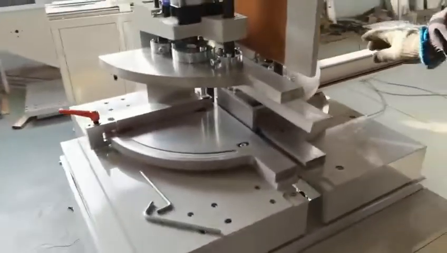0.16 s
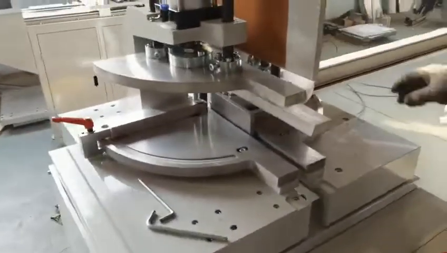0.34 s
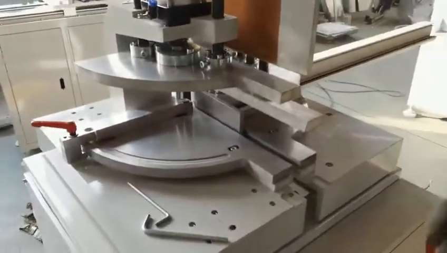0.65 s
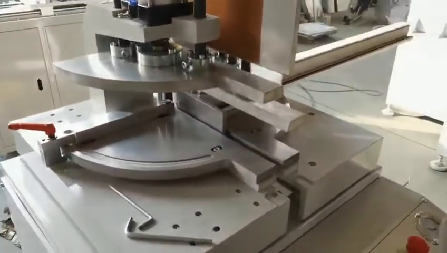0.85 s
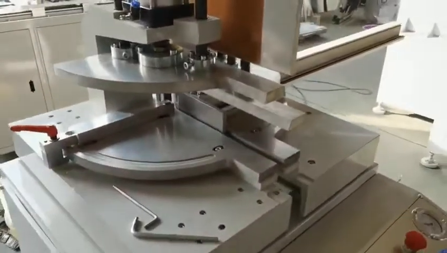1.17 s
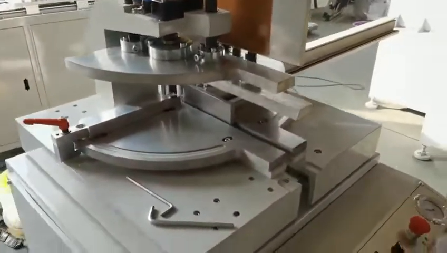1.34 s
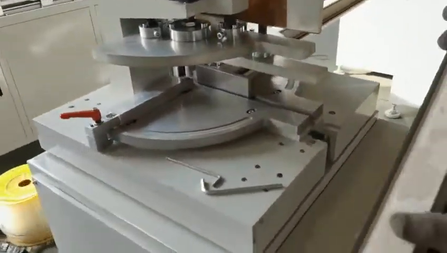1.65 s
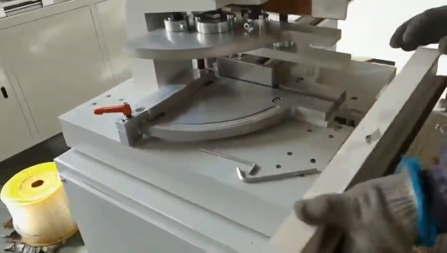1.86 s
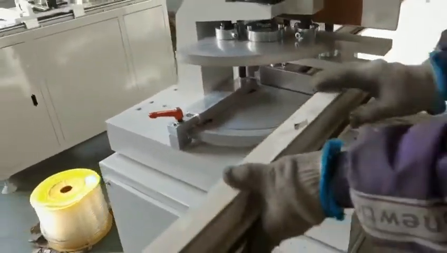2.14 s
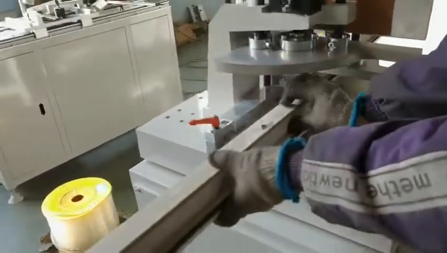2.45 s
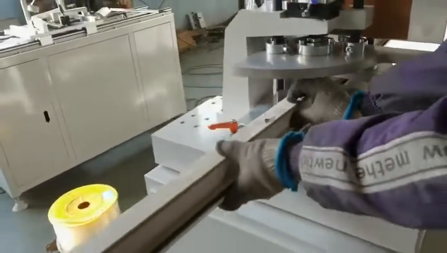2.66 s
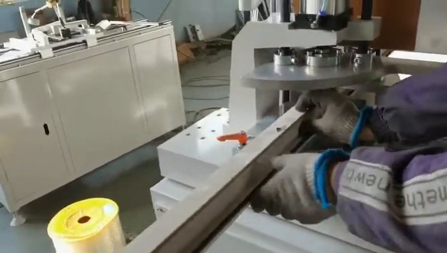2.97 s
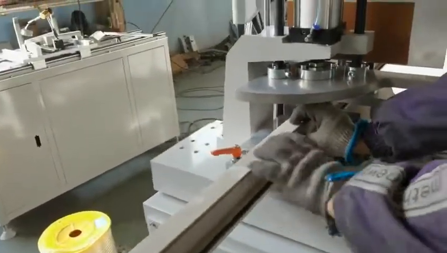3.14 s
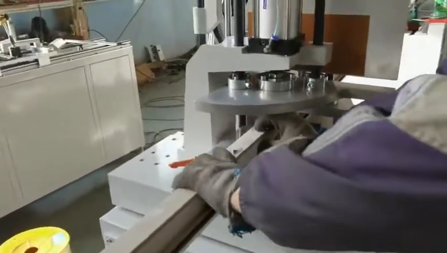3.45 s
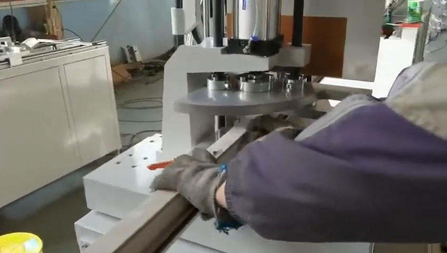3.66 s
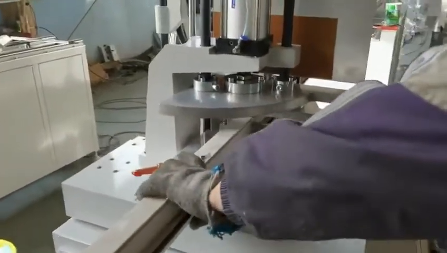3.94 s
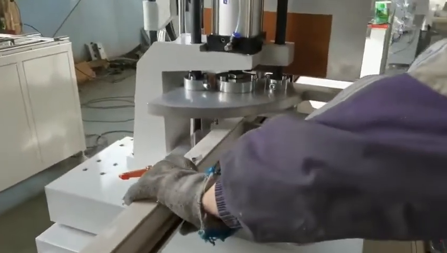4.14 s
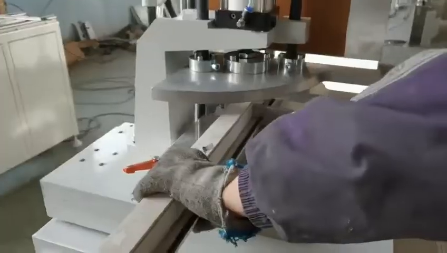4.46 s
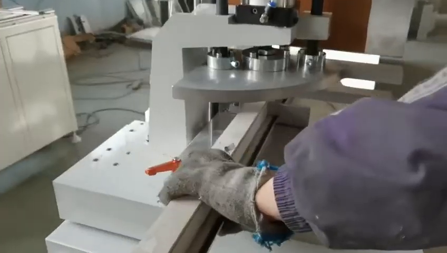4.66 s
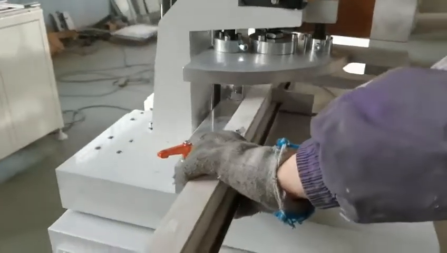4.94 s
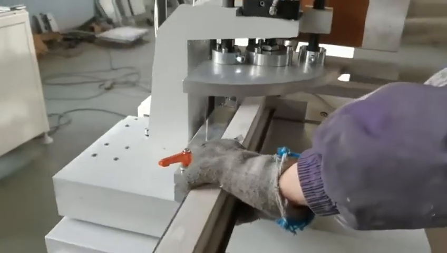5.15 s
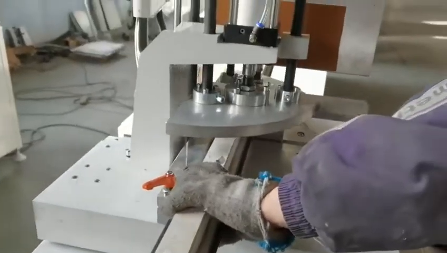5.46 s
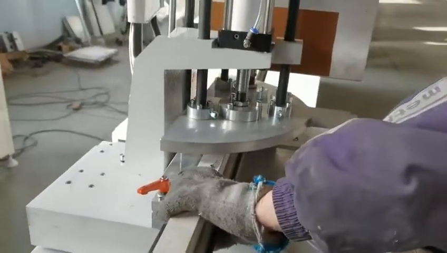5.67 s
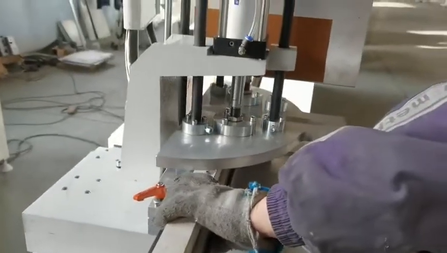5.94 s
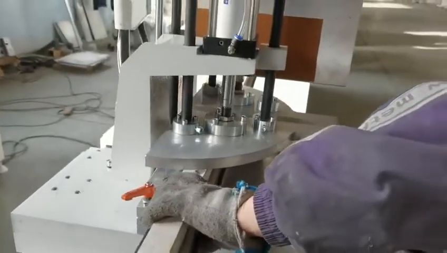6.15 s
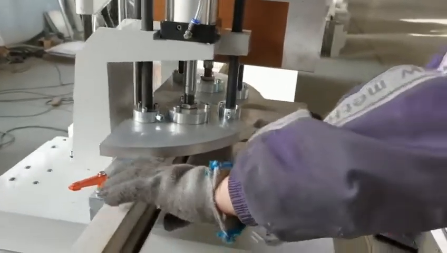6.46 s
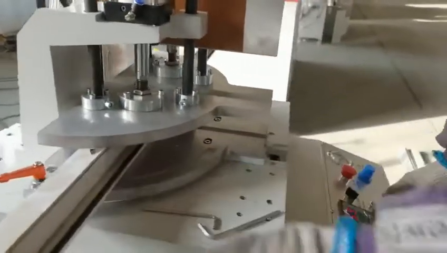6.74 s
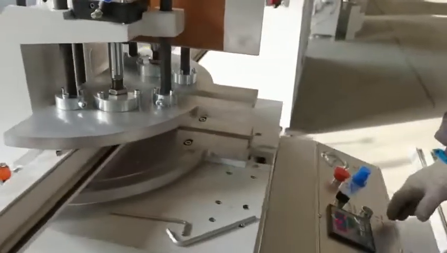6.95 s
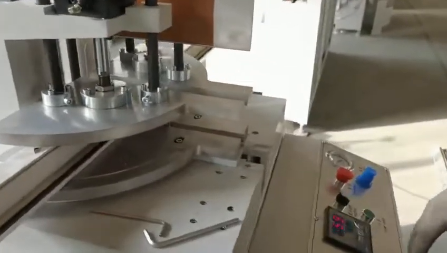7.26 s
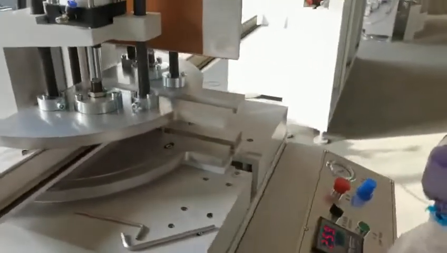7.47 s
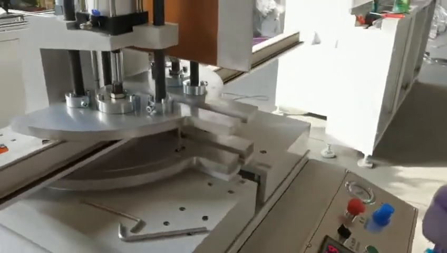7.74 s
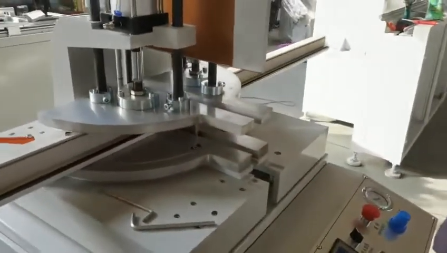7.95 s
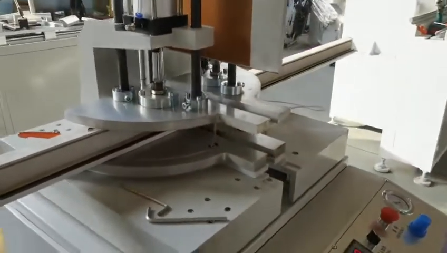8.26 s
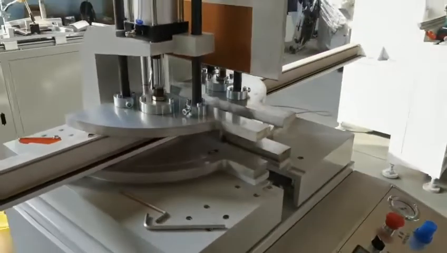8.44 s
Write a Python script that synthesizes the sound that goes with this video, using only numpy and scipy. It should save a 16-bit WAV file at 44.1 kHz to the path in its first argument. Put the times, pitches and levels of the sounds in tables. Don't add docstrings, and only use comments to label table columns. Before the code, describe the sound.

Close in a workshop with a low hum, small air spits and light metal taps come first. A hollow profile lands and knocks against stops, then two valves burst into bright fading hisses. A longer, louder press hiss follows, ending in a dull boom. After quiet leaking air, a short blast leads to hard metallic clamp slams. A small stereo microphone gives a crisp, treble-heavy sound.

```python
import sys
import numpy as np
from scipy import signal
from scipy.fft import rfft, irfft
from scipy.io import wavfile
from scipy.ndimage import uniform_filter1d

SR = 44100
rng = np.random.default_rng(int(sys.argv[2]) if len(sys.argv) > 2 else 0)


def level_to_linear(level):
    exponent = np.asarray(level, float) / 20
    return 10 ** exponent


def dump(signal):
    limited = np.clip(np.atleast_2d(signal).T, -1, 1)
    pcm = np.round(limited * 32767).astype(np.int16)
    wavfile.write(sys.argv[1], SR, pcm)


N = 379260
HZ = np.maximum(np.fft.rfftfreq(N, 1 / SR), 1)
CUTOFF_HZ = 16000
FRONT_LAG_S = -.00003

# (frequency [Hz], left-right [dB])
SIDES = [(60, 1), (110, 0), (200, 1), (380, 1.5), (700, 2), (1290, 0), (2380, 1.5), (4400, -3.5), (8120, 2),
         (12000, 7), (15000, -8)]
# (frequency [Hz], left-right likeness [0-1])
LIKENESS = [(60, 0.99), (250, 0.94), (600, 0.6), (1200, 0.021), (4000, 0.4), (12000, 0.37)]
# (frequency [Hz], level [dB per Hz])
HALL_COLOUR = [(15, -38), (25, -51.5), (54, 8), (81, -0.5), (207, -2.5), (373, -6.5), (1000, -30),
               (2020, -7.5), (4040, -16), (5280, -21.5), (7090, -19), (8550, -6.5), (10600, -36),
               (12400, -63), (15000, -44)]

# (frequency [Hz], level [dB per Hz])
RUB_COLOUR = [(240, -25), (400, -2.5), (547, 7), (673, 3), (846, 3), (1070, 4), (1290, 7.5), (2200, 1),
              (2860, -5), (4840, -120)]
# (frequency [Hz], level [dB per Hz])
TABLE_COLOUR = [(41, -42), (70, -14), (145, 7), (184, 1), (230, 4), (320, -3.5), (351, -4.5), (486, -7.5),
                (520, -8), (680, -52), (1140, -120)]
REST_DB = -62.5, -58.5, -57.5
# (peak [s], rise [s], hold [s], level [dB], fall [dB/s])
SLIDES = [(0.01, .02, 0.57, -57, 23), (1.167, 0.027, 0.053, -37, 75), (1.444, .1, .05, -52.5, 12),
          (2.325, 0.029, .01, -43, 150), (2.635, 0.24, .02, -41.5, 138), (2.856, .012, 0.039, -43.5, 76),
          (3.328, .025, 0.1, -49.5, 13), (3.863, .02, 0.11, -45.5, 50), (4.85, 0.46, .1, -53.5, 8),
          (5.758, .025, 0.009, -53, 261), (6.737, 0.19, 0.38, -55, 4.5), (8.086, 0.011, 0.013, -29, 73),
          (8.404, 0.053, 0.0077, -39, 91)]
# (peak [s], rise [s], hold [s], level [dB], fall [dB/s])
THUDS = [(.72, 0.76, .01, -46.5, 170), (.9, 0.083, .2, -48, 32), (1.14, .03, .07, -41.5, 45),
         (2.325, 0.013, 0.007, -41, 210), (2.64, .4, .01, -42.5, 46), (2.856, 0.0046, 0.016, -29, 61),
         (3.33, 0.028, 0.051, -38.5, 47), (3.832, 0.0074, 0.012, -25, 78), (4.0, .1, .05, -38, 44),
         (4.52, 0.23, .1, -49, 19), (4.9, 0.1, .03, -48.5, 100), (5.8, 0.044, 0.022, -43, 69),
         (6.37, 0.68, 0.009, -52.5, 47), (6.75, 0.026, .01, -42, 47), (7.46, .6, 0.23, -54, 97),
         (7.879, 0.079, .03, -53, 99), (8.11, 0.063, .01, -39, 81), (8.31, 0.013, 0.046, -33, 37),
         (8.4, 0.059, 0.016, -25.5, 61)]
# (peak [s], rise [s], hold [s], level [dB], fall [dB/s])
STEPS = [
    (.02, .02, 0.76, -48, 25),
    (2.85, .5, 0.49, -49, 30),
    (3.33, 0.033, .01, -37, 137),
    (3.5, 0.089, .3, -51, 40),
    (4.52, 0.12, 0.011, -46, 30),
    (5.78, 0.36, .03, -48.5, 27.5),
    (6.74, 0.23, 0.3, -45.5, 21.9),
    (7.9, 0.14, 0.08, -54, 174),
    (8.31, 0.022, 0.35, -49, 30),
]

# (frequency [Hz], level [dB per Hz])
HISS_COLOUR = [(710, -52), (1200, -14), (1590, -23.5), (2060, -14), (4350, -14), (4850, -6.5), (7350, -5.5),
               (8180, 0), (8640, 3.5), (11200, -21.5), (11800, -28.5), (15800, -31)]
# (frequency [Hz], width [Hz], level [dB])
WHISTLES = [(5230, 300, 9.5), (5570, 56, 8), (6165, 1240, 17), (8350, 340, -3), (8700, 14, -47)]
# (frequency [Hz], width [Hz], level [dB])
LEFT_VALVE_NOTES = [(4770, 64, 11), (5600, 75, 15), (6000, 75, 9), (6530, 66, 6), (7100, 56, 17),
                    (8100, 78, -7), (8560, 72, -6), (9070, 79, 11), (9300, 50, 9), (9950, 95, 11.5)]
# (left delay [s], right delay [s], level [dB])
REFLECTIONS = [(.0046, .0039, -11), (.0071, .0083, -9.5), (0.0136, .0119, -17.5), (.021, 0.028, -11.5)]
# (low edge [Hz], high edge [Hz])
AIR_EDGES_HZ = [7600, 10800], [4400, 7600], [1500, 4400], [10800, 16000]
# (peak [s], rise [s], hold [s], level [dB], fall [dB/s])
BLASTS = [
    (2.859, 0.0089, 0.059, -18.5, 105),
    (3.834, .002, .008, -23, 150),
    (3.85, 0.016, 0.046, -18.5, 22),
    (4.893, 0.0069, 0.024, -14.5, 152),
    (7.972, 0.0064, 0.012, -17.5, 300),
]
# (peak [s], rise [s], hold [s], level [dB], fall [dB/s])
EXHAUSTS = [
    (2.92, 0.066, .02, -26, 6),
    (3.9, 0.066, 0.064, -24, 9.4),
]
# (peak [s], rise [s], hold [s], level [dB], fall [dB/s])
PRESSING = [
    (4.97, 0.049, 0.83, -23.5, 44.3),
    (5.05, 0.088, 0.049, -26, 30),
    (7.985, 0.029, 0.083, -28, 54),
]
# (peak [s], rise [s], hold [s], level [dB], fall [dB/s])
LEAKS = [
    (6.1, 0.35, 0.44, -40, 14),
    (6.85, 0.5, 0.0091, -36, 88),
    (6.893, .002, 0.039, -29, 210),
    (7.0, .1, 0.95, -44, 49),
    (7.7, 0.1, 0.018, -37.5, 100),
]
# (peak [s], rise [s], hold [s], level [dB], fall [dB/s])
PUFFS = [(.215, 0.035, 0.015, -50, 41.7), (.4, .01, .02, -54.5, 100), (.49, 0.048, 0.038, -30.5, 169),
         (.76, 0.096, 0.026, -40, 30), (.9, 0.073, 0.17, -45, 200), (1.2, 0.097, 0.0055, -29, 118),
         (1.44, .1, 0.092, -50, 60), (1.57, 0.086, .01, -41.5, 100), (1.63, 0.049, 0.072, -27.5, 300),
         (1.74, 0.068, 0.017, -32, 394), (1.93, 0.3, 0.091, -54, 50), (2.115, 0.031, 0.014, -36, 250)]
# (peak [s], rise [s], hold [s], level [dB], fall [dB/s])
SCUFFS = [
    (2.346, 0.015, 0.021, -42, 89.5),
    (2.43, 0.045, 0.026, -51.5, 41),
    (2.6, 0.066, .015, -46.5, 200),
    (2.64, 0.012, 0.021, -45.5, 350),
    (6.893, .002, 0.037, -34.5, 250),
    (8.1, 0.045, 0.024, -32.5, 64.7),
    (8.25, .1, 0.13, -42, 79),
    (8.4, 0.037, 0.0074, -40, 92.5),
]
# (jet, low roar, top hiss re core [dB], left-right [dB], left valve share [0-1])
BLAST_COLOUR = (-15, -19, -17.5, -2.5, 0.57)
EXHAUST_COLOUR = (-6.5, -9.5, -12.5, -1.5, 0.34)
PRESS_COLOUR = (-4.5, -13.5, -8.5, -1.5, 0.5)
LEAK_COLOUR = (-5, -10, -16, -2.5, 0.23)
PUFF_COLOUR = (-7.5, -17, -21, -5, 0.5)
SCUFF_COLOUR = (3, -6, -43, -4.5, 0)

# (start [s], end [s], pitch [Hz], width [Hz], level
# [dB])
SQUEAKS = [(0.47, 0.82, 2450, 300, -53), (0.53, 1.01, 1830, 150, -49), (0.52, 0.8, 1600, 130, -54),
           (.48, .56, 2500, 700, -50), (2.87, 3.7, 5150, 60, -43), (4.9, 5.9, 4750, 200, -40),
           (.9, 1.004, 2640, 100, -55), (1.121, 1.36, 855, 120, -38.5), (1.157, 1.336, 257, 27, -32.5),
           (1.653, 1.71, 2480, 600, -46.5), (1.719, 1.782, 2580, 500, -38.5), (0.515, 1.4, 523, 92, -55.5),
           (2.617, 2.767, 1920, 170, -42.5), (2.717, 3.396, 1210, 200, -48), (2.854, 2.903, 5100, 220, -39),
           (4.146, 4.734, 1240, 116, -45.5), (4.25, 4.592, 1065, 58, -63.5),
           (6.548, 6.766, 1210, 110, -52.5), (6.736, 6.86, 560, 73, -45.5),
           (7.97, 8.08, 4950, 100, -38), (7.972, 8.0, 3240, 160, -40), (7.975, 8.0, 6200, 1500, -26),
               (2.44, 2.485, 2200, 500, -49), (2.44, 2.485, 1300, 700, -44.5),
               (1.115, 1.39, 3500, 830, -46.5), (1.13, 1.33, 1290, 82, -44.5),
               (1.13, 1.34, 1680, 54, -46.5), (2.556, 2.62, 1200, 810, -45), (2.632, 2.68, 2100, 630, -46),
               (3.325, 3.4, 410, 120, -35.5), (3.37, 3.395, 520, 150, -39), (8.1, 8.22, 4880, 150, -41),
               (8.1, 8.4, 4350, 92, -40.5), (8.12, 8.46, 5600, 510, -45), (8.2, 8.45, 4870, 74, -40),
               (8.58, 8.599, 540, 100, -40), (8.1, 8.45, 2300, 110, -61), (7.68, 7.78, 2070, 730, -41.5),
               (2.33, 2.38, 1010, 210, -39), (6.9, 6.96, 1100, 700, -46), (0.6, 0.67, 76, 12, -50),
               (1.48, 1.6, 8300, 1200, -44.5), (1.14, 1.3, 780, 30, -46), (1.14, 1.27, 544, 15, -50.5),
               (.35, .5, 2650, 53, -59), (.95, 1.13, 69, 10, -41.5), (7.955, 7.99, 146, 39, -35.5),
               (8.39, 8.463, 490, 250, -30.5)]
# (start [s], end [s], pitch [Hz], width [Hz], level [dB])
CYLINDER_NOTE = (8.16, 8.54, 5180, 110, -32.5)

# (pitch [Hz], level [dB], t60 [s])
PROFILE_MODES = [(546.5, -1.5, 0.13), (810, -2, 0.037), (1270, -5, 0.066), (1450, -6, 0.11),
                 (1940, -5, 0.056), (2490, 0, 0.034), (2810, -17, 0.028)]
# (pitch [Hz], level [dB], t60 [s])
BED_MODES = [(114, -17, 0.15), (149, 1.5, 0.075), (236, -23, 0.32), (320, -21, 0.047), (482, -5, 0.066)]
# (time [s], peak [dB], treble re peak [dB], bass re peak [dB], contact pitch [Hz])
TICKS = [
    (1.919, -37, 9, -31, 2200),
    (0.399, -31, 1, -14, 2060),
    (2.308, -15, -5, -25, 2030),
    (2.626, -8, 4.5, -35, 1600),
    (2.621, -28, -5, -20, 900),
    (2.359, -26, 2, -20, 1100),
    (8.041, -24, 5, -20, 2900),
    (8.388, -22, -5, -8, 500),
    (6.745, -32, 19, 7, 522),
]
# (time [s], peak [dB], treble re peak [dB], bass re peak [dB], contact pitch [Hz])
TAPS = [
    (1.112, -16.5, 21.5, -25, 905),
    (1.144, -25, -7, -16, 826),
    (2.332, -29, 12, -16, 1170),
    (2.345, -25, 8, -9, 1130),
    (2.856, -23, 3, -19, 2960),
    (4.889, -39, 19, 0, 1920),
    (6.89, -45, 3, -11, 2110),
    (7.953, -34, 23, 9, 528),
    (7.970, -24, 22, -2, 3240),
]
# (time [s], peak [dB], treble re peak [dB], bass re peak [dB], contact pitch [Hz])
CLUNKS = [
    (2.493, -21.5, -2, -25, 870),
    (2.557, -26.5, -14, -12, 568),
    (3.313, -14, -11, -31, 1010),
    (5.759, -23, 8, -7, 1490),
]
# (time [s], peak [dB], treble re peak [dB], bass re peak [dB], contact pitch [Hz])
SLAMS = [
    (8.080, -13, 10, -30, 780),
    (8.093, -9, -17, -32, 1470),
    (8.394, -15, -6, -11, 610),
]
KNOCK_T60_S = .042, .063, .09, .16
# (time [s], pitch [Hz], peak [dB], t60 [s])
STRUCK = [(1.112, 824, -29, 0.046), (1.112, 1300, -29, .05), (1.112, 1630, -28, .05),
          (1.112, 2230, -31, .04), (1.112, 6000, -22, .02), (2.308, 2610, -2, .003),
          (2.308, 5200, -5, .0025), (2.308, 1500, -14, .008), (2.315, 2000, -22, .01),
          (2.332, 1300, -13, .006), (.398, 2050, -36, .05), (2.494, 1100, -19, .012),
          (2.6263, 1400, -15, .012), (1.92, 2200, -34, .01), (3.833, 8500, -16, .02),
          (4.889, 8500, -12, .02), (2.626, 1895, -25, .04), (3.313, 954, -25, .08),
          (3.313, 1400, -30, 0.053), (3.313, 1940, -24, .045), (3.313, 2550, -23.5, 0.045),
          (3.313, 3050, -23, .045), (5.76, 600, -33, .05), (5.761, 1900, -33, .04),
          (5.767, 830, -32, 0.071), (8.079, 4754, -12.5, 0.11), (8.079, 4050, -18, .08),
          (8.081, 986, -19.5, .06), (8.093, 1513, -17, 0.067), (8.093, 2950, -21, .05),
          (8.093, 650, -26.5, 0.091), (8.396, 584, -22, 0.11), (8.392, 860, -29, .06)]
# (start [s], pitch [Hz], width [Hz], level [dB], t60 [s])
DYING = [(3.312, 505, 220, -31, 0.44), (3.335, 265, 73, -32.5, 0.51), (3.311, 930, 180, -32, 0.098),
         (5.762, 810, 230, -43, .15), (5.765, 440, 240, -39, .4), (1.113, 900, 140, -36, .12),
         (2.346, 1000, 600, -42, .05), (2.495, 700, 280, -35, 0.056), (8.079, 4670, 500, -20.5, .15),
         (2.855, 5150, 200, -31.5, .25), (7.972, 5000, 180, -35, 0.3)]


def rms_one(x):
    return x / np.sqrt(np.mean(np.atleast_2d(x).mean(axis=0) ** 2) + 1e-20)


def at_hz(points):
    hz, db = np.transpose(points)
    return np.interp(np.log(HZ), np.log(hz), db)


def pan(left_right_db):
    return level_to_linear(left_right_db * np.array([[.5], [-.5]]))


def white():
    return rng.standard_normal(N)


def band(low_hz, high_hz, order=8):
    low_cut = 1 + (low_hz / HZ) ** (2 * order)
    high_cut = 1 + (HZ / high_hz) ** (2 * order)
    return 1 / np.sqrt(low_cut * high_cut)


def peaks(rows):
    return sum(level_to_linear(db) / (1 + (2 * (HZ - hz) / width_hz) ** 2) for hz, width_hz, db in rows)


def resonator(zeros, hz, width_hz):
    r = np.exp(-np.pi * width_hz / SR)
    return [*zeros, 1, -2 * r * np.cos(2 * np.pi * hz / SR), r * r]


def drift(rate_hz):
    r = np.exp(-80 * np.pi * rate_hz / SR)
    slow = signal.lfilter([1], [1, -2 * r, r * r], rng.standard_normal(N // 40 + 2002))[2000:]
    return np.interp(np.arange(N) / 40, np.arange(len(slow)), rms_one(slow))


def per_sample(control):
    return np.interp(np.arange(N) / 32, np.arange(len(control)), control)


def swells(rows, rest_db=-120):
    t = np.arange(0, N + 32, 32) / SR
    power = level_to_linear(2 * rest_db)
    for peak_s, rise_s, hold_s, db, fall_db_per_s in rows:
        below_db = 16 * np.clip(peak_s - t, 0, None) / rise_s
        below_db = below_db * (1 + 20 * (t < peak_s - rise_s))
        fallen_db = fall_db_per_s * np.clip(t - peak_s - hold_s, 0, None)
        power = power + level_to_linear(2 * (db - below_db - fallen_db))
    return power


def two_ports(source, lag_s=0):
    alike = at_hz(LIKENESS)
    left, other = rfft(source()), rfft(source())
    shared = alike * left * np.exp(-2j * np.pi * HZ * lag_s)
    right = shared + np.sqrt(1 - alike ** 2) * other
    return np.array([left, right]) * pan(at_hz(SIDES))


def hall():
    spectrum = two_ports(white, lag_s=-0.00013) * level_to_linear(at_hz(HALL_COLOUR)) * band(28, CUTOFF_HZ, order=2)
    return level_to_linear(-52.5) * pan(-2) * rms_one(irfft(spectrum, N))


def grit():
    grains = rng.random(N) < 1500 / SR
    return white() * (0.2 + grains)


def rubbing():
    tables = (SLIDES, THUDS, STEPS)
    rub_db, rumble_db, deep_db = (per_sample(10 * np.log10(swells(rows, rest_db)))
                                  for rows, rest_db in zip(tables, REST_DB))
    rub = irfft(two_ports(grit) * level_to_linear(at_hz(RUB_COLOUR)) * band(340, 3400, order=4), N)
    shake = two_ports(white)
    rumble = irfft(shake * level_to_linear(at_hz(TABLE_COLOUR)) * band(65, 402, order=4), N)
    deep = irfft(shake * band(63, 70, order=4), N)
    out = level_to_linear(rub_db + drift(23)) * rms_one(rub)
    out = out + level_to_linear(rumble_db + 0.42 * drift(39)) * rms_one(rumble)
    return out + level_to_linear(deep_db) * rms_one(deep)


def air_flow():
    kinds = [(BLASTS, BLAST_COLOUR), (EXHAUSTS, EXHAUST_COLOUR), (PRESSING, PRESS_COLOUR),
             (LEAKS, LEAK_COLOUR), (PUFFS, PUFF_COLOUR), (SCUFFS, SCUFF_COLOUR)]
    power = np.array([swells(rows) for rows, _ in kinds])
    power[4] += level_to_linear(2 * -57)
    colour = np.array([c for _, c in kinds]).T
    core = power.sum(axis=0)
    against_db = 10 * np.log10(level_to_linear(2 * colour[:3]) @ power / core)
    pan_db, share = colour[3:] @ power / core
    return map(per_sample, (10 * np.log10(core), *against_db, pan_db, share))


def air():
    core_db, *against_db, pan_db, left_share = air_flow()
    mirrored = 1 + sum(level_to_linear(db) * np.exp(-2j * np.pi * HZ * np.array([[left_s], [right_s]]))
                       for left_s, right_s, db in REFLECTIONS)
    colour = level_to_linear(at_hz(HISS_COLOUR)) * (1 + 0.4 * peaks(WHISTLES)) * mirrored
    front = two_ports(white, FRONT_LAG_S) * colour
    left = two_ports(white, 0.000368) * colour * (1 + 0.23 * peaks(LEFT_VALVE_NOTES))
    together = drift(24) + 1.2 * drift(180)
    out = 0
    for (low_hz, high_hz), db in zip(AIR_EDGES_HZ, [0] + against_db):
        flow_db = core_db + db + 0.5 * (together + 1.17 * drift(47))
        gain = band(low_hz, high_hz, order=14)
        front_jet, left_jet = (rms_one(irfft(valve * gain, N)) for valve in (front, left))
        out = out + level_to_linear(flow_db) * (np.sqrt(1 - left_share) * front_jet + np.sqrt(left_share) * left_jet)
    return out * pan(pan_db)


def squeaks():
    out = np.zeros((2, N))
    ports = irfft(two_ports(white), N) * level_to_linear(1.8 * drift(17))
    for start_s, end_s, hz, width_hz, db in SQUEAKS + [CYLINDER_NOTE]:
        span = slice(round(start_s * SR), round(end_s * SR))
        note = signal.sosfilt([resonator([0.89, 0.0085, -0.94], hz, width_hz)], ports[:, span])
        swell = np.sin(np.pi * np.linspace(0, 1, note.shape[1]) ** .5) ** 0.72
        out[:, span] += level_to_linear(db) * swell * rms_one(note)
    return out


def ring(click, hz, t60_s):
    r, w = level_to_linear(-60 / (t60_s * SR)), 2 * np.pi * hz / SR
    return signal.lfilter([0, np.sin(w)], [1, -2 * r * np.cos(w), r * r], click + 1e-18)


def knocks():
    out, t = np.zeros((2, N + SR)), np.arange(SR // 3) / SR
    wide_edge, narrow_edge = (signal.butter(2, hz, "band", fs=SR, output="sos")
                              for hz in ([4800, 9000], [7600, 8300]))
    rise = np.minimum(t / .0008, 1)
    click = np.eye(1, len(t))[0]
    groups = zip((TICKS, TAPS, CLUNKS, SLAMS), KNOCK_T60_S)
    blows = [(*row, t60_s) for rows, t60_s in groups for row in rows]
    for s, peak_db, treble_db, bass_db, contact_hz, t60_s in blows:
        burst = rng.standard_normal((2, len(t)))
        burst[1] = .5 * burst[0] + 0.87 * burst[1]
        decay = level_to_linear(-9 - 60 * t / t60_s) + level_to_linear(-6 - 60 * t / 0.011)
        burst = burst * rise * decay + level_to_linear(6) * click
        body = signal.butter(1, [contact_hz / 1.54, contact_hz * 2.24], "band", fs=SR, output="sos")
        crack = 1.46 * np.sqrt(2000 / contact_hz) * signal.sosfilt(body, burst)
        treble = 0.5 * signal.sosfilt(wide_edge, burst) + 1.34 * signal.sosfilt(narrow_edge, burst)
        crack = crack + level_to_linear(treble_db) * treble
        modes = [(hz, db - 21.5 - 2 * abs(np.log2(hz / contact_hz)), d) for hz, db, d in PROFILE_MODES]
        modes += [(hz, db - 9.5 + bass_db, d) for hz, db, d in BED_MODES]
        chance_db = rng.normal(0, 2.5, len(modes))
        rings = sum(level_to_linear(db + more_db) * ring(click, hz, min(d, .3))
                    for (hz, db, d), more_db in zip(modes, chance_db))
        at = round(s * SR)
        out[:, at:at + len(t)] += level_to_linear(peak_db) * (crack + rings)
    top_cut = signal.butter(4, 9900, fs=SR, output="sos")
    return signal.sosfilt(top_cut, out[:, :N] + 1e-12 * white())


def struck():
    out, t = np.zeros((2, N + SR)), np.arange(SR // 4) / SR
    rise = 1 - np.exp(-t / .0003)
    port_t = t - np.array([[0], [FRONT_LAG_S]])
    for s, hz, db, t60_s in STRUCK:
        at = round(s * SR)
        out[:, at:at + len(t)] += level_to_linear(db - 60 * t / t60_s) * rise * np.sin(2 * np.pi * hz * port_t)
    return out[:, :N] * pan(-1.5)


def echo(x):
    t = np.arange(SR) / SR
    tail = rng.standard_normal((2, SR)) * level_to_linear(-60 * t / 0.29) * (t > .012)
    tail = signal.sosfilt(signal.butter(1, [400, 4000], "band", fs=SR, output="sos"), tail)
    tail /= np.sqrt(np.sum(tail ** 2, axis=1, keepdims=True))
    return level_to_linear(-16) * signal.fftconvolve(x, tail, axes=1)[:, :N]


def dying():
    out, t = np.zeros((2, N + SR)), np.arange(SR // 2) / SR
    ports = irfft(two_ports(white), N)
    for s, hz, width_hz, db, t60_s in DYING:
        at = round(s * SR)
        section = resonator([1, 0.0024, -1.007], hz, width_hz)
        note = signal.sosfilt([section] * 2, ports[:, at:at + len(t)])
        out[:, at:at + len(t)] += level_to_linear(db - 60 * t / t60_s) * np.minimum(t / .003, 1) * rms_one(note)
    return out[:, :N]


def bed_boom():
    out, t = np.zeros((2, N)), np.arange(SR // 2) / SR
    at = round(5.783 * SR)
    swing = (1 - np.exp(-t / 0.027)) * np.sin(2 * np.pi * 102 * t)
    out[:, at:at + len(t)] += level_to_linear(-19.5 - 60 * t / 0.26) * swing
    return out


def scene():
    blows = knocks() + struck()
    return hall() + rubbing() + air() + squeaks() + blows + echo(blows) + dying() + bed_boom()


def duck(x):
    level_db = 10 * np.log10(uniform_filter1d(np.mean(x ** 2, axis=0), size=128) + 1e-12)
    lead = round(.006 * SR)
    jump_db = np.append(level_db[lead:], [level_db[-1]] * lead) - level_db
    excess_db = np.clip(jump_db - 13, 0, None)
    return x * level_to_linear(-.9 * uniform_filter1d(excess_db, size=64))


def band_limit(x):
    return signal.sosfilt(signal.butter(12, 16960, fs=SR, output="sos"), x)


def record(dry):
    rounded = .98 * np.tanh(duck(dry) / .98)
    mix = signal.sosfilt(signal.cheby2(12, 70, CUTOFF_HZ * 1.035, fs=SR, output="sos"), rounded)
    mix = signal.sosfilt(signal.butter(2, 46, "high", fs=SR, output="sos"), mix)
    return band_limit(mix)


dry = scene()
out = record(dry)
dump(out)
```